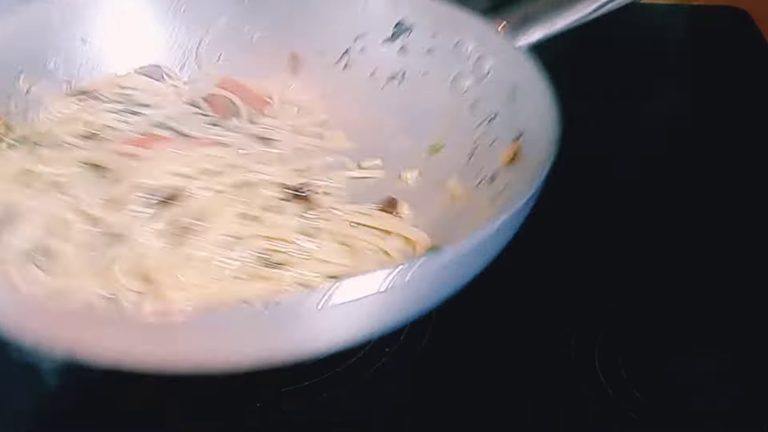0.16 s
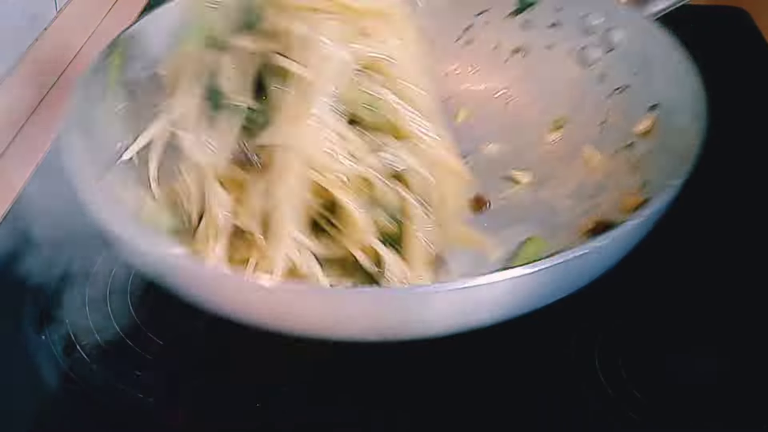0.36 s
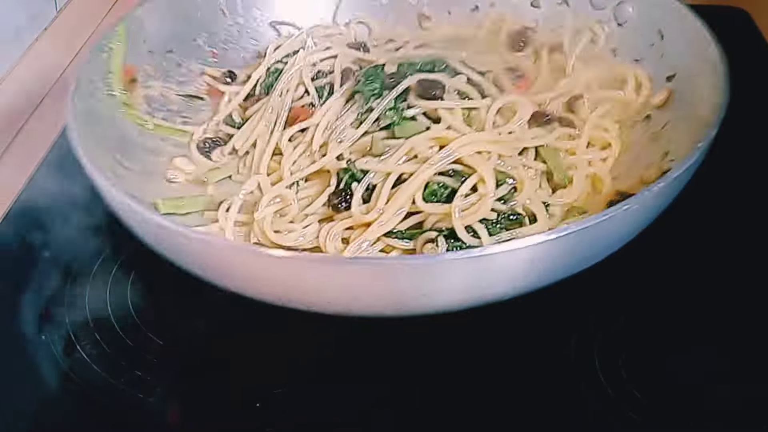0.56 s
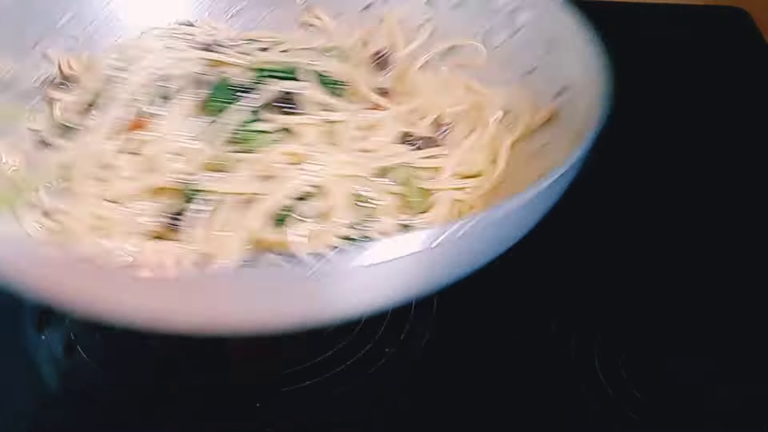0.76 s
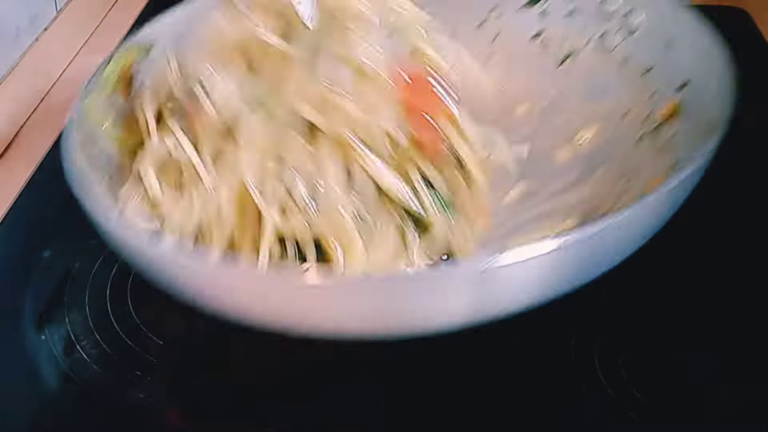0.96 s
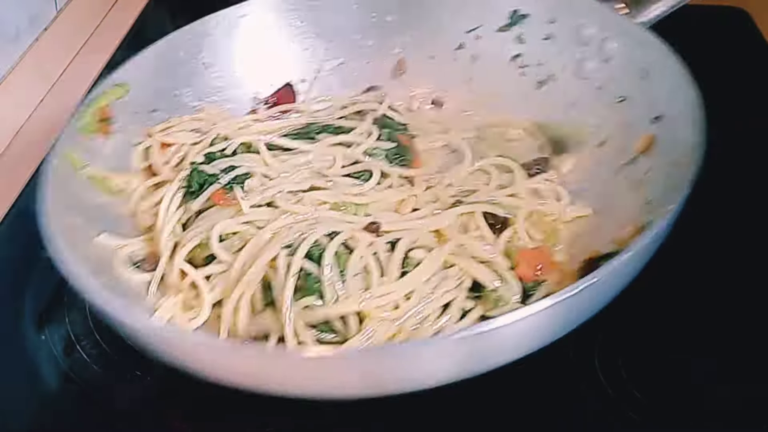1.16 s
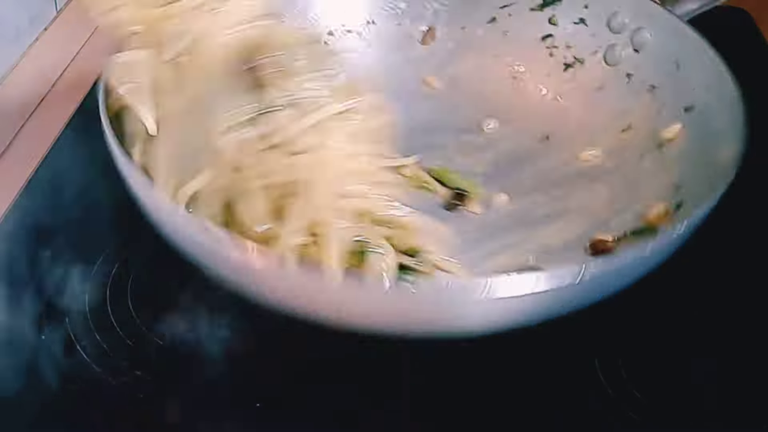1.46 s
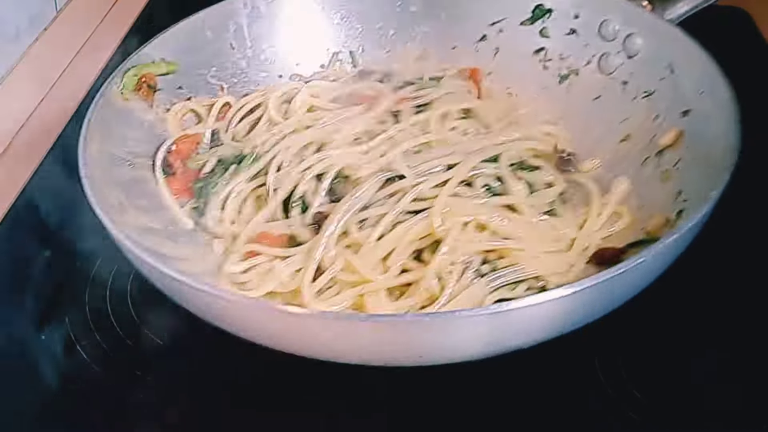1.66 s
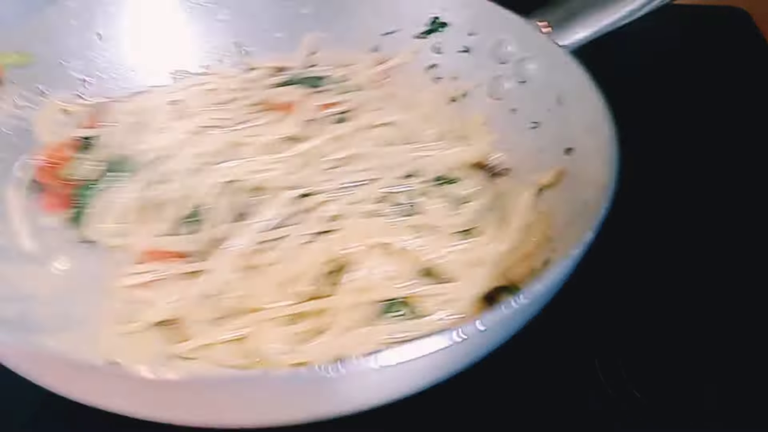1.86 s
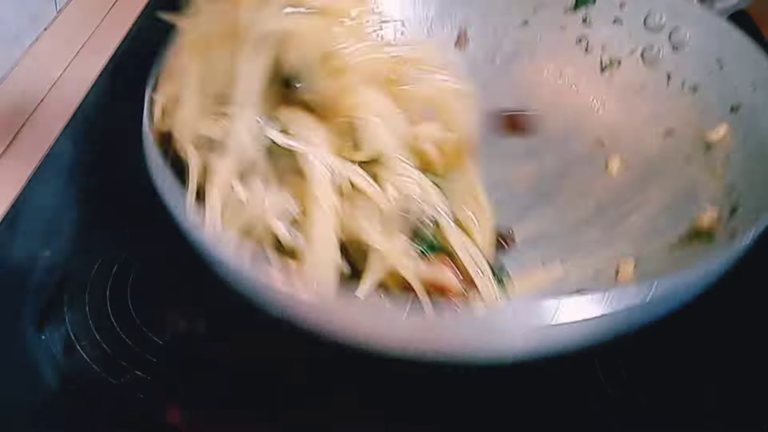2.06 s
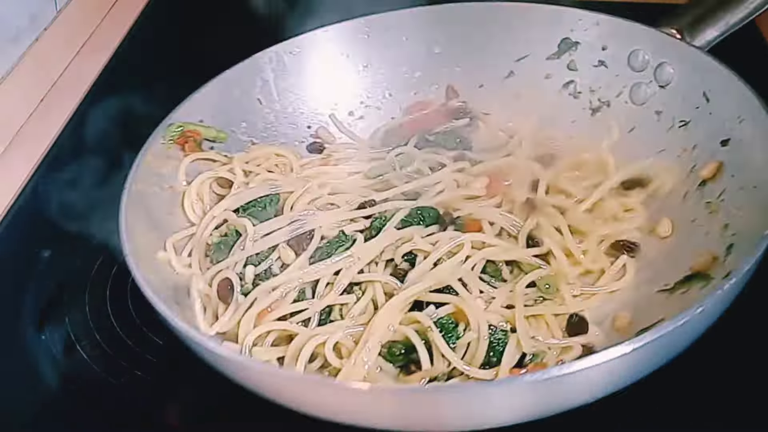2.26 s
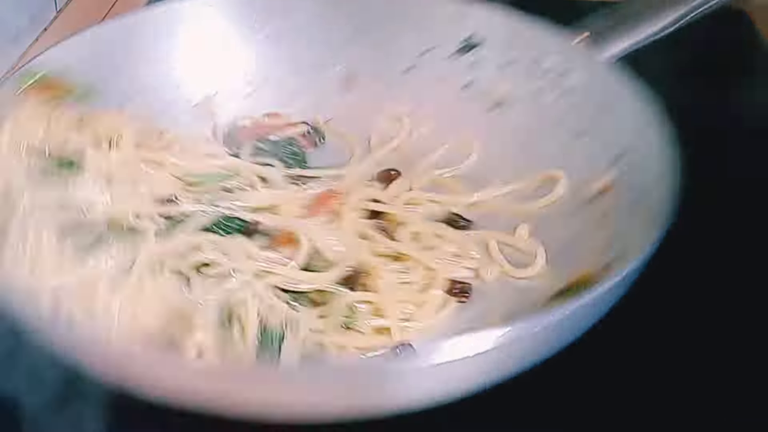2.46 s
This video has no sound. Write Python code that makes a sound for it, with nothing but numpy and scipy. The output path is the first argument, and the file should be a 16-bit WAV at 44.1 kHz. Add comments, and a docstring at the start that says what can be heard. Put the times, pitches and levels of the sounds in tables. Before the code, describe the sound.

Close stereo sound of saucy spaghetti flipped about four times in a metal pan, each toss a wet swish then a slap and short hollow clank, with quieter gaps, low hum and rumble in a lively home kitchen.

```python
"""A mains hum and a low rumble are heard first, under the wet hiss of sauced spaghetti sliding in a thin metal pan.
The hiss is coloured noise mixed with tiny random grains. Smacks are noise cracks with a ragged spray after them.
Each landing thumps the pan: a short sum of decaying modes, with a dull puff and a low thud of filtered noise.
Faint lone tones of the pan swell and fade. Decaying noise tails give the echo of a hard kitchen."""
import sys
import numpy as np
from scipy import signal
from scipy.fft import rfft, irfft, next_fast_len
from scipy.io import wavfile
from scipy.ndimage import map_coordinates

SR = 44100
rng = np.random.default_rng(int(sys.argv[2]) if len(sys.argv) > 2 else 0)


def waveform_to_disk(signal):
    """Save audio, clipped to [-1, 1], as 16-bit WAV at the path in sys.argv[1]."""
    frames = np.transpose(np.atleast_2d(signal))
    scaled = np.clip(frames, -1, 1) * 32767
    samples = np.round(scaled).astype(np.int16)
    wavfile.write(sys.argv[1], SR, samples)


N = 114660

# Spectrum of wet friction and splashes. Each row: frequency in Hz, relative level in dB per Hz.
WET_SPECTRUM = [(1650, -27), (2800, -9), (3760, -5), (4410, 0), (4950, -1), (7910, 3.5), (9070, -3.5),
                (13200, -1), (15000, -2.5), (15700, -22)]
SIDE = np.array([[.5], [-.5]])  # left and right, half of a difference each


def amp(db):
    """Decibels are logarithmic: 20 dB is a tenfold amplitude."""
    return 10 ** (np.asarray(db) / 20)


def unit(x):
    """Root mean square level brought to 1."""
    return x / np.sqrt(np.mean(x ** 2) + 1e-20)


def along(points, hz):
    """Interpolation of (Hz, value) points on a logarithmic frequency axis."""
    f, v = np.transpose(points)
    return np.interp(np.log(hz + 1), np.log(f + 1), v)


def curves(rows):
    """Linear envelopes: one value per sample for each column after the time."""
    s, *cols = np.transpose(rows)
    return [np.interp(np.arange(N) / SR, s, c) for c in cols]


def wobble(rate, size=N):
    """Slow random modulation: a smooth curve through random knots, rate of them a second."""
    knots = rng.standard_normal(int(size * rate / SR) + 4)
    return map_coordinates(knots, [np.arange(size) * rate / SR])


def filtered(x, response):
    """Linear filtering: the spectrum of x times a complex response of frequency."""
    n = x.shape[-1]
    m = next_fast_len(n + 8192)
    return irfft(rfft(x, m) * response(np.fft.rfftfreq(m, 1 / SR)), m)[..., :n]


def coloured(x, spectrum):
    """Spectral shaping, falling away below the first point, at rms 1."""
    points = [(spectrum[0][0] * .6, -70)] + list(spectrum)
    return unit(filtered(x, lambda hz: amp(along(points, hz))))


def band(x, hz, q):
    """A single resonance: gain 1 at its centre, narrower for a higher q."""
    return filtered(x, lambda f: 1j * f * hz / q / (hz * hz - f * f + 1j * f * hz / q))


def sides(db):
    """Interaural level difference: gains for left and right."""
    return amp(db * SIDE)


def grains(per_s, spread_db):
    """A random pulse process: sparse clicks of uneven size and either sign."""
    size = amp(spread_db * rng.standard_normal(N).clip(-2, 2))
    sign = np.sign(rng.standard_normal(N))
    return unit(size * sign * (rng.random(N) < per_s / SR))


def ports(hz):
    """Level and time differences: two microphone ports differ in colour and by a small lag."""
    # Each row: frequency in Hz, left over right in dB.
    lean = [(350, -10), (700, 6), (1200, 4.5), (2500, 5), (5000, -1), (9000, 3.5), (14000, 6.5)]
    left_lag_s = -0.000059
    return amp(SIDE * along(lean, hz)) * np.exp(-2j * np.pi * hz * left_lag_s * SIDE)


def leaning(x):
    """Directional filtering: a sound as the two ports hear it."""
    return filtered(x, ports)


def background():
    """Steady sources: a phase-wandering sinusoid for the mains hum over nearly mono noise for the rumble."""
    # Each row: time in seconds, rms level of the hum in dB.
    hum_levels = [(0.0, -59), (0.04, -60.5), (0.29, -65.5), (0.39, -86), (0.45, -62.5), (0.59, -62.5),
                  (0.78, -60.5), (1.14, -69), (1.18, -64.5), (1.42, -61.5), (1.62, -67), (1.68, -99),
                  (1.74, -67), (2.14, -57.5), (2.31, -69.5), (2.6, -65)]
    # Each row: frequency in Hz, relative level of the rumble in dB per Hz.
    rumble_spectrum = [(25, -42), (36, -15), (50, -1.5), (80, -5), (125, -1.5), (200, -17.5), (330, -9.5),
                       (500, -25), (730, -15), (1200, -31), (2000, -55), (3300, -120)]
    hum_hz, rumble_db = 100, -66.5

    hum_db, = curves(hum_levels)
    phase = 2 * np.pi * hum_hz * np.arange(N) / SR + 0.19 * wobble(6.6)
    hum = np.sqrt(2) * amp(hum_db) * np.sin(phase)
    noise = rng.standard_normal(N) + .4 * rng.standard_normal((2, N))
    return hum + amp(rumble_db) * coloured(noise, rumble_spectrum)


def slide():
    """Wet friction: noise and bursting films of sauce, a hiss with its own top and a duller squelch."""
    # Each row: time in seconds, hiss level in dB before hiss_gain_db, gain of its top above 9 kHz in dB,
    # level of the squelch in dB before squelch_gain_db.
    slide_levels = [(0.0, -61.5, 7, -61.5), (0.1, -55.5, 5, -69), (0.11, -42.5, 4, -58),
                    (0.16, -53, 0.5, -56), (0.29, -35, -4.5, -42), (0.31, -42.5, 1.5, -44),
                    (0.37, -30, 1.5, -39.5), (0.38, -36.5, 4.5, -40.5), (0.42, -29.5, -5, -31),
                    (0.5, -32, 4, -35.5), (0.61, -46, -4, -55.5), (0.68, -42.5, 3.5, -47),
                    (0.74, -42.5, 2, -51), (0.87, -38.5, 3, -44.5), (1.01, -52.5, 7, -50.5),
                    (1.04, -43.5, -6, -43), (1.24, -64.5, 10, -69.5), (1.29, -60, -3.5, -68.5),
                    (1.45, -48.5, -5, -43.5), (1.53, -61.5, 0.5, -61.5), (1.6, -36.5, -15, -34),
                    (1.63, -45, -5, -45.5), (1.64, -48, -0.5, -31.5), (1.66, -51.5, 12.5, -44),
                    (1.82, -71.5, 12, -71.5), (1.93, -42.5, 1, -53.5), (1.98, -51.5, 5, -49.5),
                    (2.07, -50.5, -2, -52.5), (2.11, -58, 4.5, -60.5), (2.2, -41.5, 0, -43),
                    (2.22, -26.5, -8, -34), (2.23, -35, -3.5, -36.5), (2.32, -55, 2, -60),
                    (2.38, -83, 29, -74), (2.45, -50, -5, -59), (2.6, -54, 1, -52.5)]
    # Each row: frequency in Hz, relative level of the squelch in dB.
    squelch_spectrum = [(300, -13.5), (800, -16.5), (1250, -7), (2200, -5.5), (3000, -1), (4500, -15)]
    hiss_gain_db, squelch_gain_db = 3.5, -2
    grain_db, grains_per_s = 0.5, 1300

    hiss_db, top_db, squelch_db = curves(slide_levels)
    flutter = amp(1.5 * wobble(30))

    fine = amp(grain_db) * grains(grains_per_s, spread_db=9.5)
    hiss = coloured(rng.standard_normal((2, N)) + fine, WET_SPECTRUM)
    top = filtered(hiss, lambda hz: 1 / (1 + (9000 / (hz + 1)) ** 8))
    hiss = amp(hiss_db + hiss_gain_db) * (hiss - top + amp(top_db) * top)

    coarse = amp(-5) * grains(350, spread_db=3.5)
    squelch = coloured(rng.standard_normal((2, N)) + coarse, squelch_spectrum)
    squelch *= amp(squelch_db + squelch_gain_db + 1.74 * wobble(49.13))
    return leaning(flutter * (hiss + squelch))


def smacks():
    """Impulsive wet contact: a sharp noise crack, resonant at its own pitch, with a ragged spray after it."""
    # Each row: start in seconds, level in dB, resonance in Hz, level of the part around 1.6 kHz in dB,
    # level of the spray in dB.
    smack_rows = [(0.0275, -28.5, 12270, -22, -2), (0.1145, -22.5, 4460, -15.5, -6),
                  (0.179, -25.5, 6540, -13, -9), (0.235, -20, 12450, -15.5, -6),
                  (0.2497, -20, 6450, -6.5, -15), (0.2748, -18, 12800, -16, -12),
                  (0.351, -21, 5840, -20, -11), (0.3672, -10, 6630, -16, -11), (0.4047, -14, 3140, -26, -1),
                  (0.4656, -3.5, 6800, -21, -29), (0.4994, -8.5, 6230, -36, -23),
                  (0.5603, -14, 13700, -14.5, -4), (0.632, -26.5, 7260, -8.5, -7),
                  (0.6703, -19.5, 6540, -11, -29), (0.7795, -29, 11300, -4.5, -28),
                  (0.8103, -14.5, 12400, -17.5, -35), (0.8347, -10.5, 10900, -21, -17),
                  (0.859, -4.5, 13000, -23.5, -7), (0.9054, -23.5, 12000, -7, -16),
                  (1.033, -21.5, 3100, -3, -23.5), (1.1208, -25.5, 11300, -4, -20),
                  (1.1438, -17, 11760, -47, -30), (1.172, -23.5, 12500, -39, -18),
                  (1.2159, -25.5, 7540, -20, 4), (1.341, -31.5, 3020, -52, 13),
                  (1.4325, -22.5, 8060, -33.5, -24), (1.565, -27, 6040, -16, -13),
                  (1.6409, -3, 8840, -25, -28), (1.7204, -20, 5550, -22, -16),
                  (1.854, -28.5, 8500, -48, -20), (1.8612, -20, 12000, -53, -15),
                  (1.9208, -19, 4640, -50, -37), (1.9953, -23.5, 14100, -19, 6),
                  (2.0402, -16.5, 14100, -32, -17), (2.0629, -9, 12400, -48, -40.5),
                  (2.1473, -15.5, 13400, -39, -9), (2.2044, -21.5, 3380, -26, 3),
                  (2.2132, -5, 6280, -17.5, -18), (2.2672, -16.5, 12400, -26, -36),
                  (2.3, -9, 12200, -36, -43), (2.3178, -20, 14520, -26, -24),
                  (2.4077, -18.5, 13400, -58, -22), (2.4392, -26, 5060, -55.5, -20),
                  (2.5113, -21.5, 11400, -31, -22), (2.575, -30, 13300, -32, -24)]
    rise_s, smack_t60_s, spray_t60_s = 0.00023, 0.041, 0.11
    snap_db, snap_t60_s = 12, .003
    tone_db, tone_q = -1.5, 4.7
    alike = 0.16  # share of the noise power common to both ears

    out, t = np.zeros((2, N + SR)), np.arange(SR // 8) / SR
    for s, db, hz, body_db, spray_db in smack_rows:
        # the spray's level jumps every 40 samples
        ragged = amp(4.5 * np.repeat(rng.standard_normal(len(t) // 40 + 1), 40)[:len(t)])
        snap = amp(snap_db - 60 * t / snap_t60_s)
        spray = amp(spray_db - 60 * t / spray_t60_s) * ragged
        shape = (1 - np.exp(-t / rise_s)) * (snap + amp(-60 * t / smack_t60_s) + spray)

        common, apart = rng.standard_normal(len(t)), rng.standard_normal((2, len(t)))
        noise = np.sqrt(alike) * common + np.sqrt(1 - alike) * apart
        tone = amp(tone_db) * unit(band(noise, hz, tone_q))
        crack = shape * (coloured(noise, WET_SPECTRUM) + tone)
        body = band(band(shape * noise, 1600, 0.89), 1600, 0.89)
        crack /= abs(crack.sum(axis=0)).max()
        body /= abs(body.sum(axis=0)).max()
        out[:, round(s * SR):][:, :len(t)] += amp(db) * (crack + amp(body_db) * body)
    return leaning(out[:, :N])


def pan_ring(t, u, octave):
    """Modal synthesis: a blow excites the pan's modes most near its loudest pitch, at new levels each time."""
    # Each row: frequency in Hz, level in dB, t60 in seconds before the landing's length share,
    # left over right in dB, left lead in radians. Every mode radiates its own way.
    pan_modes = [(329, -6, 0.18, -1, 0.38), (585, -11, 0.19, 5, 1), (709.3, -2, .14, 13, 1.32),
                 (858, -7, 0.092, -9, 1.76), (1047, -9.5, 0.079, -1, 0.47), (1158.7, -13.5, 0.2, 7.5, 1.1),
                 (1314, 1.5, 0.069, 6.5, 1.35), (2167, 3, 0.052, -3, 0.9), (2830, -9.5, 0.165, 5, 1.5),
                 (3340, -12, .05, 1, 0.57)]
    fall_db = 10  # loss of a mode one octave from the loudest pitch
    linger_db, linger_times = -40, 2.5  # the free rim rings on, weaker and longer
    sag, sag_s, wander_rad = .03, .02, .7  # modes start 3 % sharp, settle under the load and wander

    settling = t + sag * sag_s * (1 - np.exp(-t / sag_s))
    ring = 0
    for hz, level, t60, pan_db, lead in pan_modes:
        detune = rng.normal(1, .011)
        off_pitch = np.log2(hz / 1000) - octave
        level_now = level - fall_db * off_pitch ** 2 + rng.normal(0, 0.9)
        decay = amp(-60 * u / t60) + amp(linger_db - 60 * u / (t60 * linger_times))
        phase = 2 * np.pi * (hz * detune * settling + rng.random())
        phase = phase + wander_rad * wobble(45, size=len(t)) + lead * SIDE
        ring = ring + amp(level_now) * sides(pan_db) * decay * np.sin(phase)
    return ring


def pan():
    """Impact excitation: soft heavy blows ring the pan, with a dull puff and a low thud."""
    # Each row: start in seconds, level in dB before pan_gain_db, loudest pitch in octaves from 1 kHz,
    # gain of the ring in dB, length as a share of the decay times.
    thump_rows = [(.282, -22.5, 0.36, -7, 0.57), (.403, -28, 0.2, 3.5, 0.82),
                  (.420, -13.5, 0.28, 4.5, 0.55), (.447, -11, 1, -29, 0.57), (.464, -18, -0.5, -3.5, 0.52),
                  (.499, -15.5, 0.85, -8, 0.49), (.561, -31.5, 0.56, 4.5, 0.36), (.905, -36, 0.89, 2, 0.88),
                  (1.0345, -24.5, 0.42, -5.5, 1.36), (1.052, -28.5, -0.16, -12, 2.1),
                  (1.084, -31, 0.2, -9, 1.2), (1.121, -31.5, 0.05, -4.5, 1.46),
                  (1.143, -21, -0.72, -6.5, 0.32), (1.163, -34, 0.004, -16, 0.67),
                  (1.155, -26.5, -0.5, -13, 0.85), (1.574, -26, 0.59, 4.5, 0.69),
                  (1.599, -27.5, -0.0011, 0, 0.85), (1.635, -31, 0.077, -4.5, 1.2),
                  (1.648, -37.5, -0.4, 4, 1.12), (2.164, -24.5, 0.099, 1, 0.39),
                  (2.181, -28, -0.2, 7.5, 0.65), (2.195, -31.5, -0.12, 11.5, 0.89),
                  (2.205, -13, 1, -8.5, 0.302), (2.213, -22.5, -0.11, 0.5, 0.79),
                  (2.239, -34, -0.3, -6, 1.2), (2.299, -16, -0.52, -17, 0.13)]
    pan_gain_db, puff_db, thud_db = -8, -4.5, -27
    puff_t60_s, thud_t60_s = 0.05, 0.26  # before the length share
    blow_rise_s, ring_rise_s = 0.00022, .002
    # the moving pasta makes the ring waver, fully after flutter_grows_s
    flutter_db, flutter_grows_s = 3.5, .015

    out, t = np.zeros((2, N + SR)), np.arange(SR // 3) / SR
    for s, db, octave, ring_db, length in thump_rows:
        u = t / length
        flutter = flutter_db * np.minimum(t / flutter_grows_s, 1) * wobble(68, size=len(t))
        ring = amp(ring_db + flutter) * (1 - np.exp(-t / ring_rise_s)) * pan_ring(t, u, octave)

        puff_hz = 1000 * 2 ** octave
        puff = band(band(rng.standard_normal((2, len(t))), puff_hz, 1.36), puff_hz, 1.35)
        puff = unit(leaning(puff)) * amp(puff_db - 60 * u / puff_t60_s)
        thud = unit(band(band(rng.standard_normal(len(t)), 110, 0.16), 110, 0.16))
        thud *= amp(thud_db - 60 * u / thud_t60_s)

        blow = (1 - np.exp(-t / blow_rise_s)) * (ring + puff + thud)
        out[:, round(s * SR):][:, :len(t)] += amp(db + pan_gain_db) * blow
    return out[:, :N]


def tones():
    """Friction-driven resonance: single pan modes swell softly as the pasta drags, then fade, wavering."""
    # Each row: start in seconds, frequency in Hz, level in dB before the swell, swell time in seconds,
    # t60 in seconds.
    tone_rows = [(.56, 953, -63, .01, 0.27), (1.165, 958, -47, 0.021, 0.24),
                 (2.115, 764, -39.5, 0.029, 0.42), (2.3, 736.3, -51, 0.0095, 0.23)]
    out, t = np.zeros((2, N + SR)), np.arange(SR // 3) / SR
    for s, hz, db, swell, t60 in tone_rows:
        decay = amp(db - 60 * t / t60 + 2 * wobble(50, size=len(t)))
        shape = (1 - np.exp(-t / swell)) ** 2 * decay
        sine = np.sin(2 * np.pi * (hz * t + rng.random((2, 1))))
        out[:, round(s * SR):][:, :len(t)] += shape * sine
    return leaning(out[:, :N])


def kitchen(x):
    """Reverberation off hard walls: decaying noise tails, a new one for each third of a second."""
    # Each row: frequency in Hz, t60 in seconds.
    decay_times = [(300, 0.28), (2000, 0.31), (6000, 0.4), (14000, 0.21)]
    out, step = np.zeros((2, N + SR)), SR // 3
    delay = 130  # samples, about 3 ms before the tail
    for a in range(0, N, step):
        hz, t, z = signal.stft(rng.standard_normal((2, SR // 2)), SR, nperseg=256)
        decay = amp(-60 * t / along(decay_times, hz)[:, None])
        tail = signal.istft(z * decay, SR, nperseg=256)[1]
        tail /= np.linalg.norm(tail[0])
        wet = signal.fftconvolve(x[None, a:a + step], tail, axes=1)
        out[:, a + delay:][:, :wet.shape[1]] += wet
    return out[:, :N]


def scene():
    """Superposition: the impacts and tones excite the room; slide and background are added without it."""
    room_db = -4
    near = smacks() + pan() + tones()
    return near + amp(room_db) * kitchen(near.mean(axis=0)) + slide() + background()


def record(dry):
    """Band limiting: nothing is kept from 15950 Hz up."""
    return filtered(dry, lambda hz: hz < 15950)


dry = scene()
out = record(dry)
waveform_to_disk(out)
```